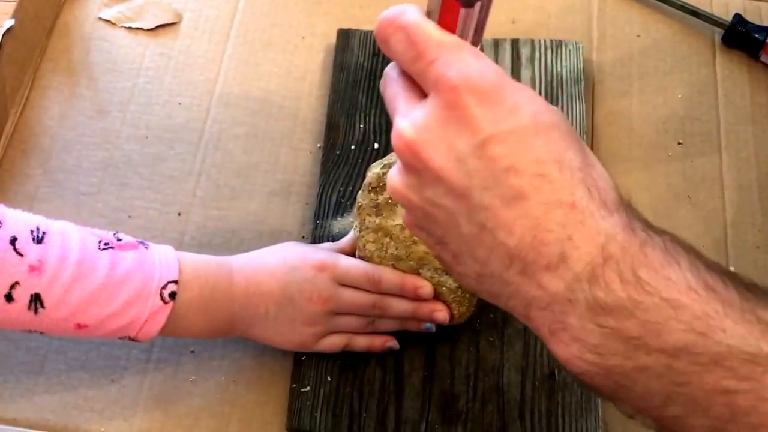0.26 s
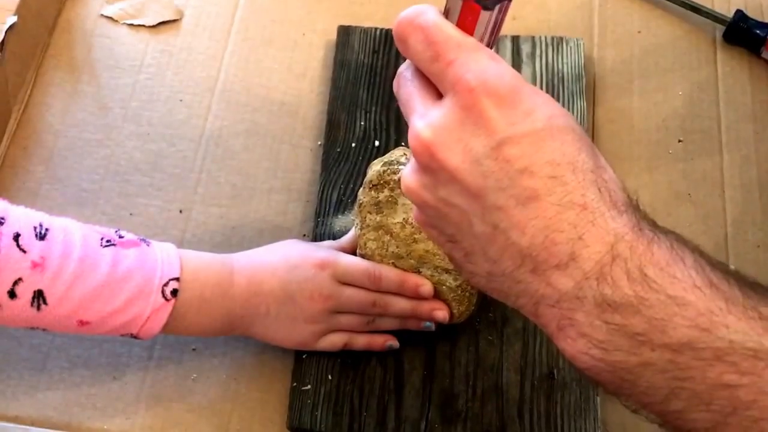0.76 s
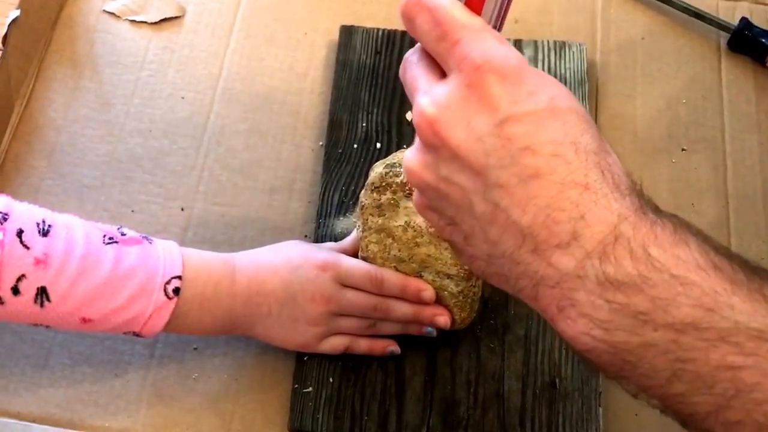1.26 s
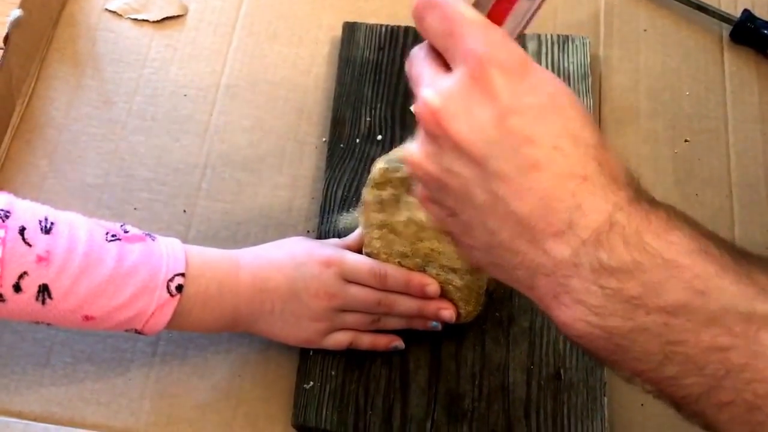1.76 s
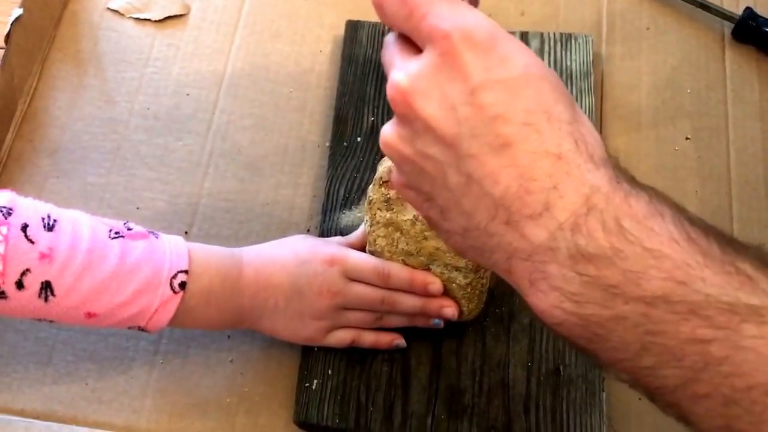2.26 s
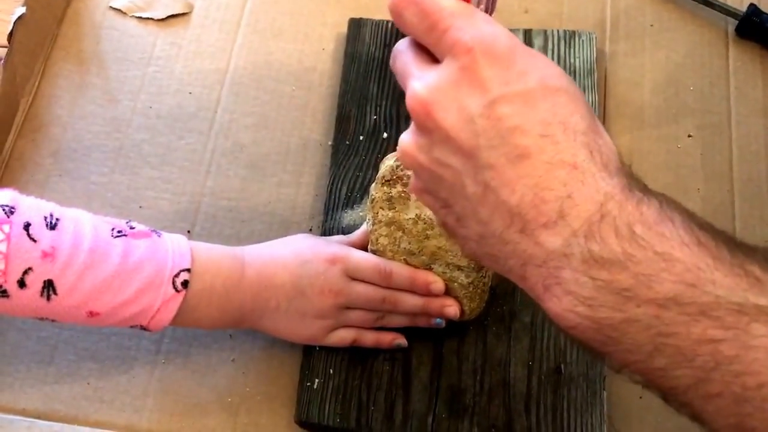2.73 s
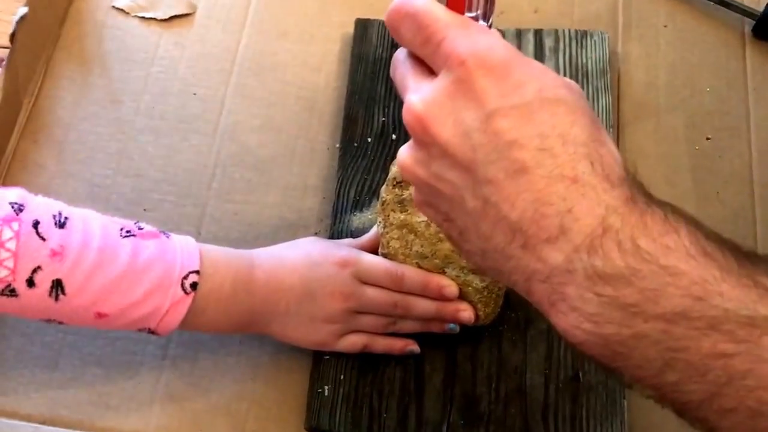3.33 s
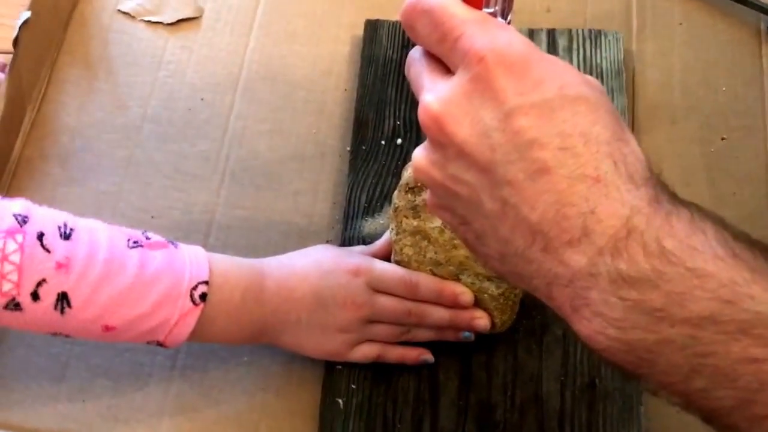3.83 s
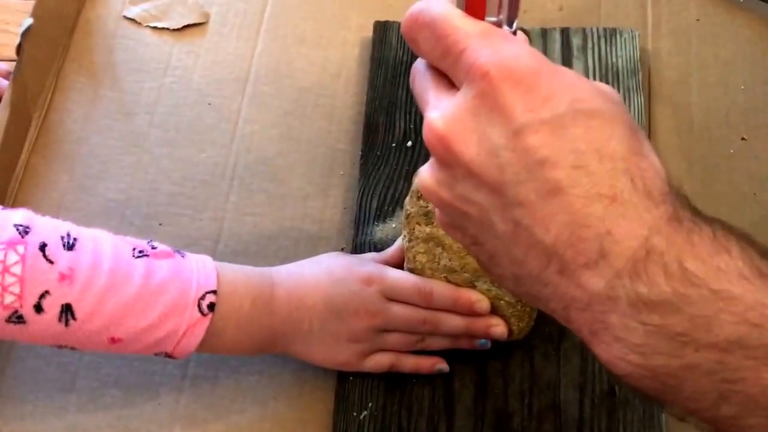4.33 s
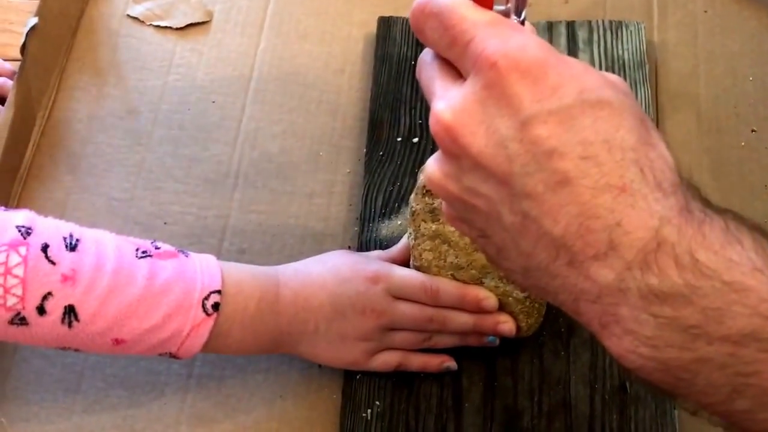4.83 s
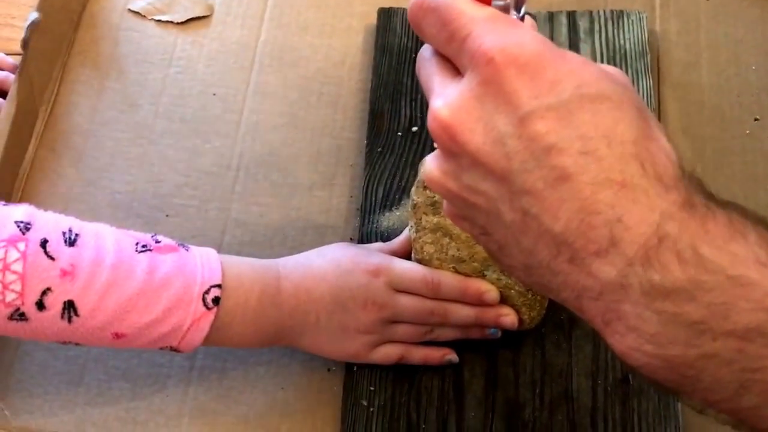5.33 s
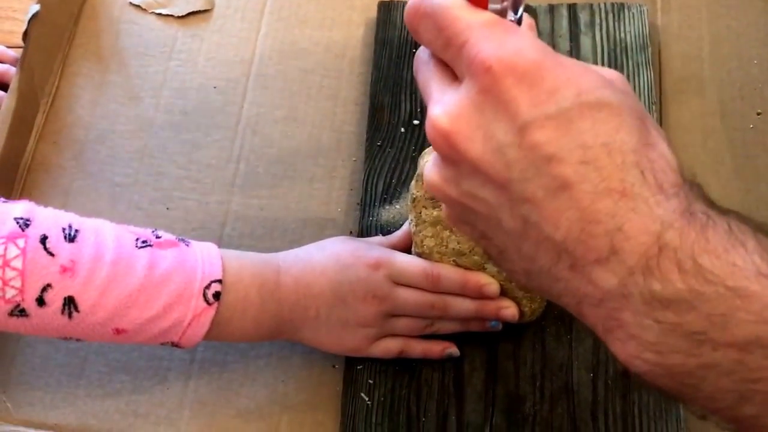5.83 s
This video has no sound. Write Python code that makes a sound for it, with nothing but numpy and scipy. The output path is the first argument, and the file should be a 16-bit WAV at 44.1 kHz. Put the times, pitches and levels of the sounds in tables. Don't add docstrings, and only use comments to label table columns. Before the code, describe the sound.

A hammer hits a screwdriver held on a stone about a dozen times, sharp cracks with stony knocks, woody thuds and faint steel ringing indoors.

```python
import sys
import numpy as np
from scipy import signal
from scipy.io import wavfile
from scipy.ndimage import uniform_filter1d, minimum_filter1d

SR = 44100
rng = np.random.default_rng(int(sys.argv[2]) if len(sys.argv) > 2 else 0)


def bounce(signal):
    frames = np.transpose(np.atleast_2d(signal))
    limited = np.clip(frames, -1, 1)
    pcm = np.round(limited * 32767).astype(np.int16)
    wavfile.write(sys.argv[1], SR, pcm)


def gain_from_db(level_db):
    decades = np.asarray(level_db, float) / 20
    return 10 ** decades


N = 268569


def evened(x):
    return x / np.sqrt(np.mean(x ** 2) + 1e-20)


def read(hz, table_hz, value):
    return np.interp(np.log(hz + 1), np.log(np.add(table_hz, 1)), value)


def add(mix, start_s, sound):
    part = mix[round(start_s * SR):][:len(sound)]
    part += sound[:len(part)]


def mode(t, hz, db, t60_s, rise_s=0.0006):
    out = np.zeros(len(t))
    t = t[t < 2 * t60_s]
    swell = 1 - np.exp(-t / rise_s)
    out[:len(t)] = gain_from_db(db - 60 * t / t60_s) * swell * np.sin(2 * np.pi * hz * t)
    return out


def band(x, low_hz, high_hz):
    return signal.sosfilt(signal.butter(2, [low_hz, high_hz], "band", fs=SR, output="sos"), x)


# (pitch_hz, density_db)
HUSH_SHAPE = [(15, -18.5), (35, 0), (60, 0), (90, -11.5), (125, -13), (170, -18), (260, -11), (500, -22),
              (1200, -22), (2500, -28), (5000, -29.5), (10000, -35.5), (14500, -31.5), (16000, -38.5)]
HUSH_DB = -66


def hush():
    frames, hz = N // 256 + 5, np.fft.rfftfreq(1024, 1 / SR)
    real, imag, patches = rng.standard_normal((frames, 513, 3)).T
    patches = evened(uniform_filter1d(uniform_filter1d(patches, 12, 0), 14, 1))
    shape_db = read(hz, *np.transpose(HUSH_SHAPE))[:, None]
    z = (real + 1j * imag) * gain_from_db(shape_db + 0.6 * patches)
    return gain_from_db(HUSH_DB) * evened(signal.istft(z, nperseg=1024, noverlap=768)[1][:N])


# (pitch_hz, level_db)
HUM_TONES = [(60, -67), (120, -72), (14400, -95)]


def hum():
    t = np.arange(N) / SR
    return sum(gain_from_db(db) * np.sin(2 * np.pi * hz * t) for hz, db in HUM_TONES)


# (pitch_hz, t60_s, walls_db, near_db), near = scatter off table and hands
ROOM_BANDS = [(60, 0.9, -4.5, -5.5), (180, 0.82, 2, 5), (495, 0.95, -11, -8.5), (1274, 1, -2, 6.5),
              (2400, 1, -16.5, -5), (5060, 1, -18.5, -3.5), (9000, 0.72, -13, -1.5),
              (11100, 0.079, -19, -7), (14900, 0.46, -19.5, -17.5)]
NEAR_T60_S = 0.24


def room(x):
    hz, t, z = signal.stft(rng.standard_normal(SR + SR // 2), SR, nperseg=256)
    band_hz, t60_s, walls_db, near_db = np.transpose(ROOM_BANDS)
    fall_db = 60 * t / read(hz, band_hz, t60_s)[:, None]
    walls = gain_from_db(read(hz, band_hz, walls_db)[:, None] - 33.0 - fall_db)
    near = gain_from_db(read(hz, band_hz, near_db)[:, None] - 30.5 - 60 * t / NEAR_T60_S)
    tail = signal.istft(z * np.hypot(walls, near), SR, nperseg=256)[1]
    tail = tail * np.clip((np.arange(len(tail)) / SR - .002) / 0.0017, 0, 1)
    return signal.fftconvolve(x, tail)[:len(x)]


DUST_DB, DUST_T60_S, GRAINS_PER_S = -55, 0.68, 600


def dust():
    t = np.arange(N) / SR
    power = 0
    for start_s, *_ in BLOWS:
        power = power + gain_from_db(DUST_DB - 60 * np.maximum(t - start_s, 0) / DUST_T60_S) ** 2 * (t > start_s)
    size = gain_from_db(3.5 * np.minimum(rng.exponential(1, N), 4))
    grains = (rng.random(N) < GRAINS_PER_S / SR) * size * rng.standard_normal(N)
    smear = rng.standard_normal(300) * gain_from_db(-60 * t[:300] / 0.0054)
    smeared = signal.oaconvolve(grains, smear)[:N]
    return power ** .5 * evened(band(smeared + 0.4 * rng.standard_normal(N), 5700, 20000))


# (time_s, level_db)
SLIPS = [
    (2.67, -71),
    (2.698, -77.5),
    (2.72, -62.5),
    (2.752, -71),
    (2.785, -59),
    (2.81, -72.5),
]


def scrape():
    time_s, level_db = np.transpose(SLIPS)
    t = np.arange(N) / SR
    slips = rng.standard_normal(N) * (.7 + 9 * (rng.random(N) < 300 / SR))
    return evened(band(slips, 800, 1900)) * gain_from_db(np.interp(t, time_s, level_db, -120, -120))


# (start_s, peak_db, pitch_hz)
ROLLING = [(0.1336, -45, 6520), (0.1488, -39.5, 3900), (0.17, -37, 3800), (0.1925, -36.5, 6100),
           (0.7076, -42.5, 4480), (0.72, -48, 8100), (0.7394, -53, 6250), (0.753, -51, 6200),
           (1.1057, -53, 7300), (1.9444, -47, 7100), (1.9981, -40, 3180), (2.0881, -30, 5450),
           (2.1276, -44.5, 14900), (2.1477, -45, 7100), (2.1772, -36, 12200), (2.1993, -46.5, 3760),
           (2.2372, -51.5, 3860), (2.3149, -33, 3950), (2.326, -41, 5970), (2.357, -48, 4430),
           (2.4094, -57, 4400), (2.436, -52, 4470), (2.5162, -50, 6900), (2.5236, -51, 5360),
           (2.7143, -54, 7400), (2.736, -56, 6200), (2.761, -59.5, 7000), (2.7844, -53, 5220),
           (2.80, -60, 6000)]
# (start_s, peak_db, pitch_hz)
THROWN = [(1.4494, -37, 9300), (1.5285, -49.5, 9150), (1.699, -33.5, 12500), (1.779, -11, 9500),
          (1.8844, -47, 14400), (2.9981, -29, 10300), (3.4361, -36, 9300), (3.7394, -39, 9550),
          (3.9474, -42, 9460), (4.1974, -50.5, 9020), (4.2547, -45, 13600), (4.5047, -40, 9250),
          (4.554, -46, 13100), (4.7611, -57, 9400), (4.7995, -42, 9000), (4.8628, -42, 9160),
          (5.0594, -50, 12000), (5.0838, -43, 12000), (5.1248, -40, 11000), (5.235, -52, 13100),
          (5.5292, -43, 13000), (5.5503, -38, 12100), (5.6276, -44, 11000), (5.7987, -46, 12000),
          (5.86, -52, 12500), (5.993, -41, 9000), (4.93, -52, 13000), (4.142, -52, 12000)]
ROLLING_T60_S, THROWN_T60_S = 0.021, 0.007
TAP_DB, TAP_PER_DB = -9, 1.26


def tick(peak_db, pitch_hz, tap_db, t60_s):
    t = np.arange(3000) / SR
    low_hz, high_hz = np.clip(pitch_hz * .5, 500, 7000), np.clip(pitch_hz * 2.8, 9000, 15800)
    click = band(rng.standard_normal(3000), low_hz, high_hz) * gain_from_db(-60 * t / (t60_s * .4))
    tap = band(rng.standard_normal(3000), 120, 1000) * gain_from_db(tap_db + 9.5 - 60 * t / (3 * t60_s))
    return gain_from_db(peak_db - 6) * (1.4 * click + mode(t, pitch_hz, -3.5, t60_s)) + tap


def grit():
    out = np.zeros(N)
    for start_s, peak_db, pitch_hz in ROLLING:
        tap_db = peak_db + TAP_DB + (TAP_PER_DB - 1) * (peak_db + 40)
        add(out, start_s, tick(peak_db, pitch_hz, tap_db, ROLLING_T60_S))
    for start_s, peak_db, pitch_hz in THROWN:
        add(out, start_s, tick(peak_db, pitch_hz, -95, THROWN_T60_S))
    return out


# (pitch_hz, level_db, t60_s, swing_sign at the microphone)
BOARD_MODES = [(64.1, -21.5, 0.6, 1), (87.2, -30, 0.46, 1), (116.8, -23.5, 0.35, -1),
               (145.3, -8.5, 0.15, 1), (171.4, -5.5, 0.14, 1), (187.8, 3, 0.049, -1), (206, -18, .3, 1),
               (222.3, -13, 0.28, 1), (243.3, -20, 0.28, 1), (251.7, -24, .6, -1), (287.7, -23, 0.55, 1),
               (313.9, -19.5, 0.22, -1), (334.8, -21, 0.38, -1), (388.2, -32, 0.47, 1)]
ARRIVES_S, SWELLS_S, DEEPEST_S = .0027, .0055, .0187
REBOUND_S, REBOUND_HZ, REBOUND_DB, REBOUND_T60_S = .0172, 190, -3.5, .018


def thud(t, floor_db=0):
    swing = np.zeros(len(t))
    for hz, db, t60_s, sign in BOARD_MODES:
        level = gain_from_db(db + floor_db * (hz < 180) - 60 * t / t60_s)
        swing += np.sign(sign) * level * np.cos(2 * np.pi * hz * (t - DEEPEST_S))
    start = 1 - np.exp(-np.maximum(t - ARRIVES_S, 0) / SWELLS_S)
    rebound = mode(np.maximum(t - REBOUND_S, 0), REBOUND_HZ, REBOUND_DB, REBOUND_T60_S, .003)
    return -start * swing - rebound


def nudge():
    return gain_from_db(-42.0) * thud(np.arange(SR) / SR)


# (pitch_hz, t60_s, twin_gap_hz, twin_db)
STEEL_MODES = [(7039, .68, 2.8, -7), (5348, .55, 23, -7), (6503, .5, 9, -11)]
PING_DB, PING_T60_S = 9.5, 0.14


def ring(t, rings_db):
    out = np.zeros(len(t))
    for db, (hz, t60_s, gap_hz, twin_db) in zip(rings_db, STEEL_MODES):
        out += mode(t, hz, db, t60_s, .0015)
        out += mode(t, hz, db + PING_DB, PING_T60_S, .0008)
        out += mode(t, hz + gap_hz * rng.uniform(.6, 1.4), db + twin_db, t60_s, .0015)
    return out


# (start_s, pitch_hz, level_db)
FLAKE_NOTES = [(1.357, 565, -23), (2.878, 616, -17), (2.878, 1480, -6.5), (2.878, 1960, -9),
               (2.888, 1780, -16), (3.307, 603, -14), (3.307, 3540, -1.5), (4.316, 1300, -22),
               (5.325, 1970, -24), (5.682, 3900, -2), (3.306, 4100, -15)]
FLAKE_T60_CYCLES = 12


def flakes(t, blow_s):
    out = np.zeros(len(t))
    for start_s, hz, db in FLAKE_NOTES:
        if abs(start_s - blow_s) < .05:
            out += mode(np.maximum(t - start_s + blow_s, 0), hz, db + 6, FLAKE_T60_CYCLES / hz)
    return out


def sizzle(t, split_db):
    ragged = gain_from_db(30 * uniform_filter1d(rng.standard_normal(SR), size=60))
    return gain_from_db(split_db - 9 - 60 * t / .07) * band(rng.standard_normal(SR), 2500, 15500) * ragged


# (low_hz, high_hz, level_db)
SMACK_BANDS = [(324, 737, -1.5), (945, 3510, -8), (2000, 4800, -5.5), (5800, 9340, -13),
               (10400, 17000, -19)]


def smack(t, parts_db):
    out = np.zeros(len(t))
    for k, (low_hz, high_hz, db) in enumerate(SMACK_BANDS):
        out += (-1) ** k * gain_from_db(db + parts_db[k] - 30.0) * evened(band(1. * (t == 0), low_hz, high_hz))
    return out


# (pitch_hz, level_db, t60_s)
STONE_MODES = [(583, -26.5, 0.01), (700, 11, 0.035), (799, 2.5, 0.077), (1180, 18, 0.016),
               (1410, 14.5, 0.0095), (1548, -3, 0.024), (1990, 7, 0.015)]


def knock(t, pitch):
    late = np.maximum(t - .0006, 0)
    out = np.zeros(len(t))
    for hz, db, t60_s in STONE_MODES:
        detune = 1 + .01 * rng.standard_normal()
        out += mode(late, hz * pitch * detune, db + rng.standard_normal(), t60_s)
    return out


# (pitch_hz, level_db, t60_s)
HANDLE_MODES = [(3420, 2.5, 0.0038), (4160, -4.5, .005), (6042, -4.5, 0.0084), (7983, 11, 0.0031),
                (8960, -1, 0.0058), (10630, -15.5, 0.0037), (12500, -10, 0.0066), (14900, -1, 0.0007)]


def crack(t, sharp_db, bright_db, top_db):
    out = np.zeros(len(t))
    for hz, db, t60_s in HANDLE_MODES:
        range_db = sharp_db if hz < 6000 else bright_db if hz < 10000 else top_db
        detune = 1 + .02 * rng.standard_normal()
        out += mode(t, hz * detune, db + 1.5 * rng.standard_normal() + range_db, t60_s, .0003)
    return out


# (start_s, thud_db, tip_bite_db, stone_split_db, head_ring_db)
BLOWS = [(1.357, -4.5, -12.5, -23, -31.5), (1.772, -6.5, -16.5, -35.5, -44),
         (2.878, -20.5, -15, -36.5, -38.5), (3.307, -8.5, -22, -33, -42.5), (3.633, -6.5, -14, -36, -41),
         (3.984, -7.5, -14, -35, -43.5), (4.316, -7.5, -13, -33.5, -43), (4.645, -8, -17, -38.5, -45.5),
         (4.98, -8, -17, -38.5, -48.5), (5.3258, -8.5, -13, -21, -40), (5.681, -8, -14.5, -36, -52),
         (6.068, -8, -16, -32, -42)]
EARLIER_BLOW = (-0.3616, -2.5, -14.5, -42, -45)
# (start_s, low_mode_db, middle_mode_db)
OFF_CENTRE_BLOWS = [
    (1.772, -44, -64),
    (2.878, -43, -64),
    (3.633, -55, -47),
    (4.316, -40, -62),
    (5.325, -49, -45),
    (5.682, -50, -60),
    (6.068, -49, -54),
]
CENTRED_DB = (-56, -59.5)
USUAL_THUD_DB, USUAL_SPLIT_DB = -8, -33
KNOCK_DB, KNOCK_PER_THUD, PITCH_PER_THUD = -17, .35, -.033
FLOOR_PER_THUD = -.4
DULL_DB, MIDDLE_DB, MIDDLE_PER_SPLIT = -1.5, 2.5, -0.87
CRACK_DB, CRACK_PER_SPLIT, SHARP_DB = -11, -.45, -10.5
FLAKE_SPREAD, RING_SPREAD = 0.34, 0.12


def strike(start_s, thud_db, bite_db, split_db, ring_db):
    t = np.arange(SR) / SR
    seated, split = thud_db - USUAL_THUD_DB, split_db - USUAL_SPLIT_DB
    knock_db = KNOCK_DB + KNOCK_PER_THUD * seated
    crack_db = CRACK_DB + CRACK_PER_SPLIT * split
    middle_db = bite_db + MIDDLE_DB + MIDDLE_PER_SPLIT * split
    off_centre = [row[1:] for row in OFF_CENTRE_BLOWS if abs(row[0] - start_s) < .05]
    lower_db = (off_centre + [CENTRED_DB])[0]

    handle = gain_from_db(7.5) * crack(t, SHARP_DB, bite_db, split_db + 31 + crack_db)
    stone = gain_from_db(knock_db - 1.0) * knock(t, 1 + PITCH_PER_THUD * seated)
    contact = smack(t, (thud_db + DULL_DB, middle_db, SHARP_DB, bite_db, split_db + 20.0))
    splitting = sizzle(t, split_db)
    board = gain_from_db(thud_db + 8.0) * thud(t, FLOOR_PER_THUD * seated)
    steel = ring(t, (ring_db, *lower_db))
    chips = flakes(t, start_s)

    toned = handle + stone
    direct = toned + board + splitting + 0.22 * contact + steel + chips
    spread = .08 * toned + .16 * board + .3 * splitting + 2.11 * contact
    return direct, spread + RING_SPREAD * steel + FLAKE_SPREAD * chips


def scene():
    near, far = np.zeros((2, N + SR))
    for row in list(BLOWS) + [EARLIER_BLOW]:
        direct, spread = strike(*row)
        add(near, row[0] + 1.0003, direct)
        add(far, row[0] + 1.0003, spread)
    blows = (near + room(far))[SR:]
    ticks = grit()
    add(ticks, .707, nudge())
    return (blows + ticks + 0.44 * room(ticks) + scrape() + dust() + hum() + hush())[None]


CEILING, RECOVERY_DB_PER_S = .7, 460.0


def limit(x):
    need_db = np.minimum(20 * np.log10(CEILING / (abs(x) + 1e-9)), 0)
    rise_db = np.arange(N) * RECOVERY_DB_PER_S / SR
    held_db = np.minimum.accumulate(need_db - rise_db) + rise_db
    return x * gain_from_db(uniform_filter1d(minimum_filter1d(held_db, size=41), size=21))


def top_cut(x):
    return signal.sosfilt(signal.butter(12, 16500, fs=SR, output="sos"), x)


def record(dry):
    x = limit(dry[0])
    dull = band(x, 60, 8500)
    for early, level_db in ((1024, -34.5), (512, -42.5)):
        x = x + gain_from_db(level_db) * np.pad(dull[early:], (0, early))
    x = signal.oaconvolve(x, signal.firwin(255, 15950, fs=SR), "same")
    return top_cut(x[None])


dry = scene()
out = record(dry)
bounce(out)
```